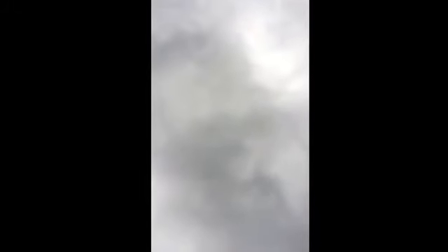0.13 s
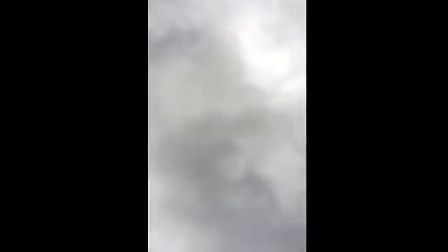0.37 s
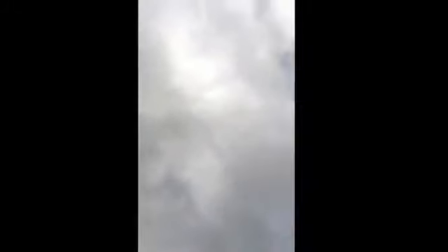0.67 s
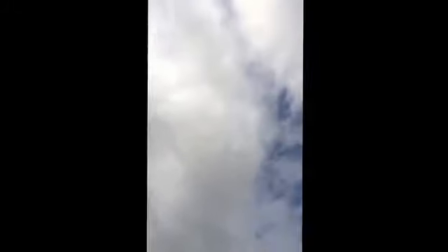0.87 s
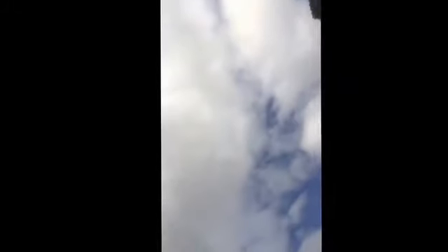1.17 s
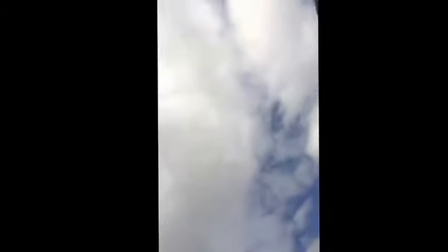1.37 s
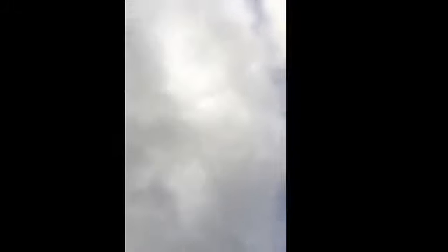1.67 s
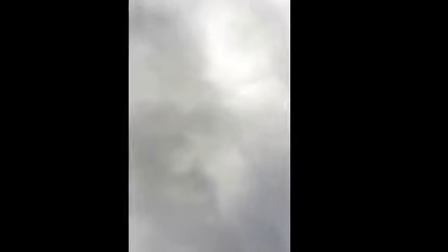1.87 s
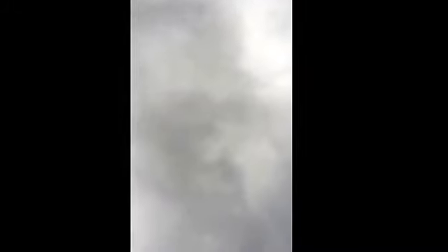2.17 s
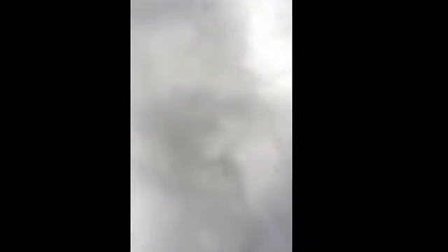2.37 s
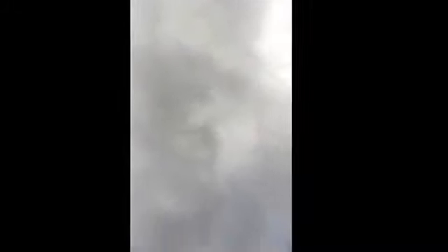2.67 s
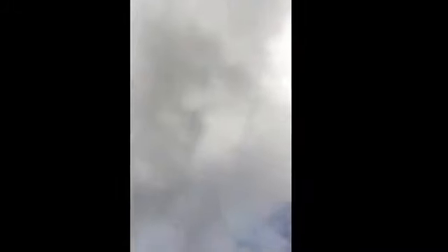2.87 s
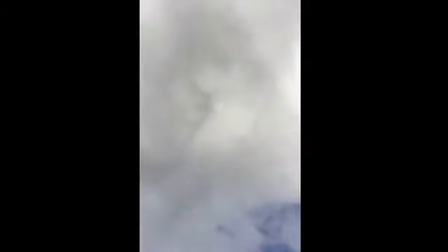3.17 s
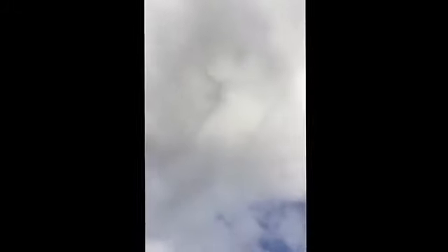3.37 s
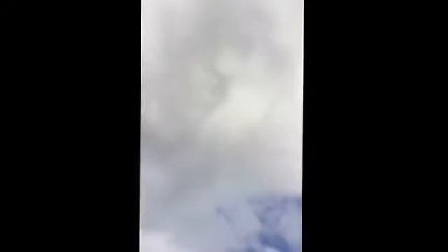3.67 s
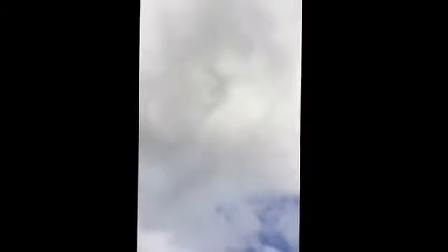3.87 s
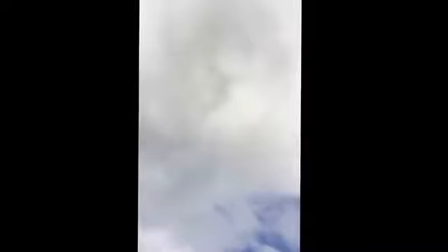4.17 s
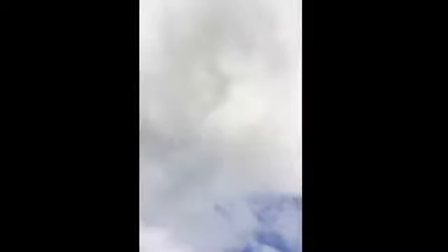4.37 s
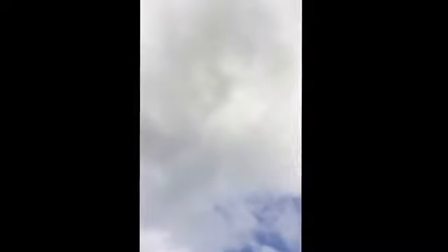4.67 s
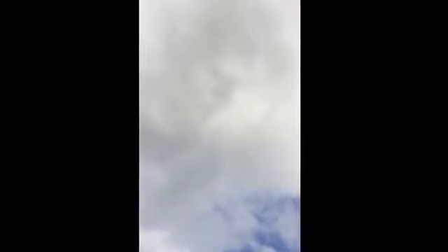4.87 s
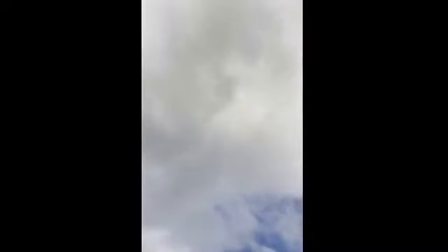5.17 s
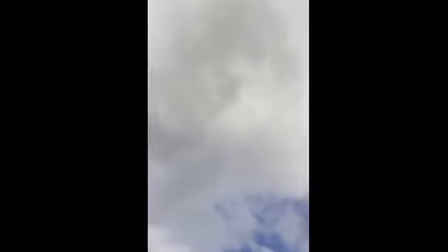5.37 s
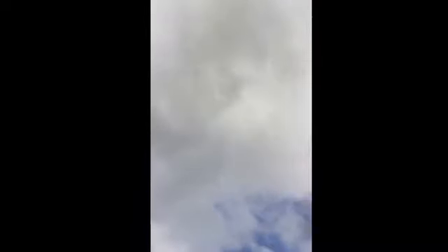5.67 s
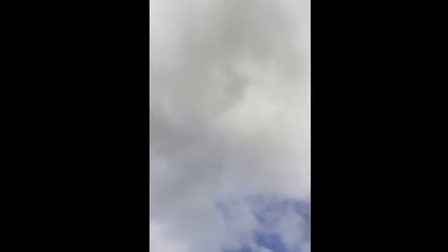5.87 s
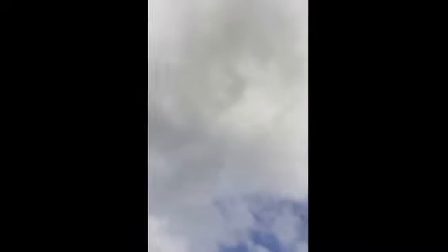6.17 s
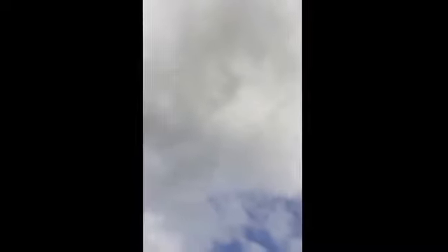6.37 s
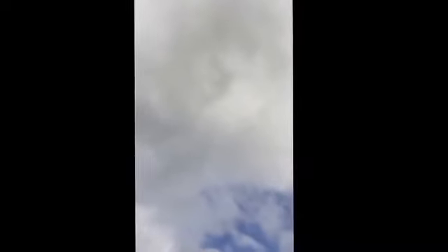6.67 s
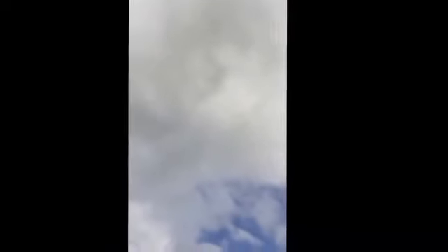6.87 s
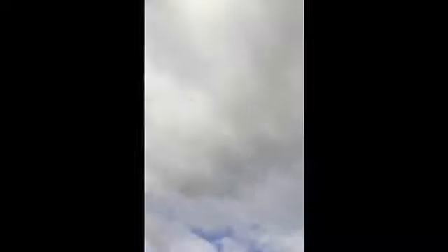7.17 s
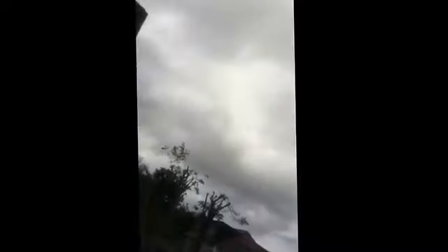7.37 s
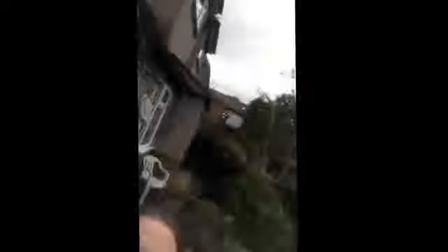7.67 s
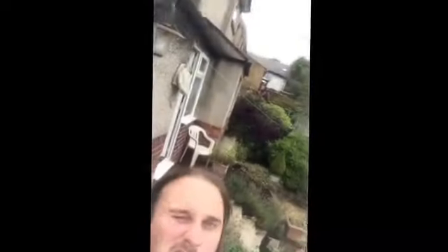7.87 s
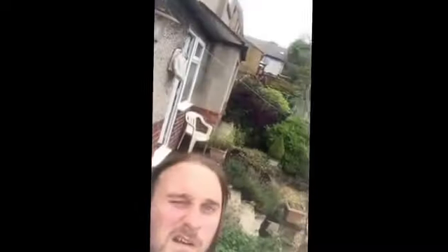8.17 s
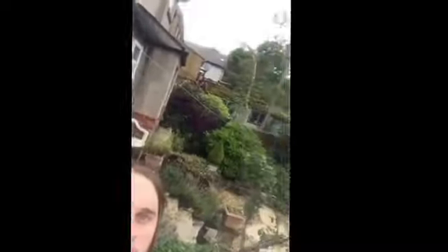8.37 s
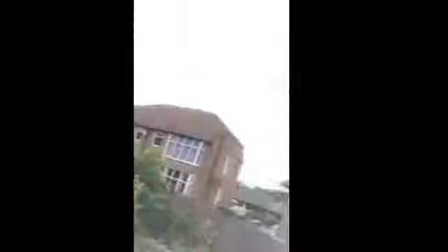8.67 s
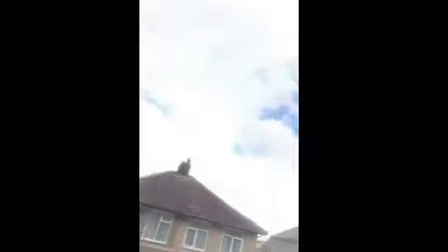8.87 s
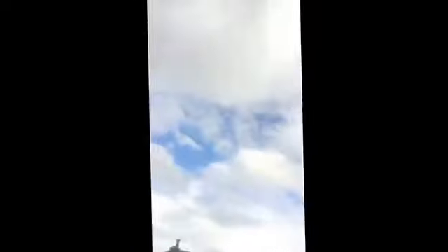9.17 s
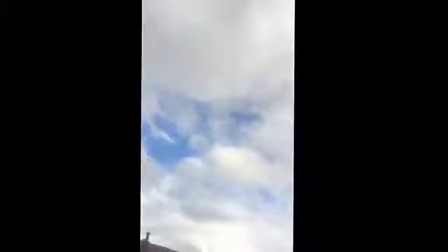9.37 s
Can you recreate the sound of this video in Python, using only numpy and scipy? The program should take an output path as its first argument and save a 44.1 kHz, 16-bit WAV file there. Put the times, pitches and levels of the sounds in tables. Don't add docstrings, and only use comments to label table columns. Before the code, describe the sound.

A woodpecker gives sharp, spaced single calls across a garden while fingers rub, tap and loudly knock the case of the listening phone.

```python
import sys
import numpy as np
from scipy import signal
from scipy.fft import rfft, irfft, next_fast_len
from scipy.io import wavfile
from scipy.ndimage import uniform_filter1d, map_coordinates

SR = 44100
rng = np.random.default_rng(int(sys.argv[2]) if len(sys.argv) > 2 else 0)


def to_linear_factor(level_db):
    exponent = np.asarray(level_db, float) / 20
    return 10 ** exponent


def waveform_to_disk(signal):
    frames = np.transpose(np.atleast_2d(signal))
    scaled = np.clip(frames, -1, 1) * 32767
    samples = np.round(scaled).astype(np.int16)
    wavfile.write(sys.argv[1], SR, samples)


N = 419832

# centre_hz, width_hz, level_db
PAD_MODES = [(400, 380, -1), (1487.6, 1200, 0.5), (4200, 620, -14)]
TOP_HZ = 15300


def unit(x):
    return x / np.sqrt(np.mean(x ** 2) + 1e-20)


def along(points, hz):
    f, v = np.transpose(points)
    return np.interp(np.log(hz + 1), np.log(f + 1), v)


def wobble(rate, size=N):
    knots = rng.standard_normal(int(size * rate / SR) + 4)
    return map_coordinates(knots, [np.arange(size) * rate / SR])


def filtered(x, response):
    m = next_fast_len(len(x) + 4096)
    return irfft(rfft(x, m) * response(np.fft.rfftfreq(m, 1 / SR)), m)[:len(x)]


def resonances(modes):
    def response(f):
        return sum((-1) ** k * to_linear_factor(db) * 1j * f * width / (hz * hz - f * f + 1j * f * width)
                   for k, (hz, width, db) in enumerate(modes))
    return response


def add(track, s, x):
    part = track[round(s * SR):][:len(x)]
    part += x[:len(part)]


def tail(t60s, size):
    hz, t, z = signal.stft(rng.standard_normal(size), SR, nperseg=128)
    fade = to_linear_factor(-60 * t / along(t60s, hz)[:, None])
    x = signal.istft(z * fade, SR, nperseg=128)[1]
    return x / np.linalg.norm(x)


def floor():
    # pitch_hz, level_db (per Hz)
    air_colour = [(470, -11), (950, -8), (1600, -14), (5000, -19.5), (9600, -26.5), (10500, -30.5),
                  (11500, -27), (15200, -33)]
    # pitch_hz, level_db (per Hz)
    rumble_colour = [(15, -44), (27, -17), (60, -2.5), (140, -4), (220, -2.5), (330, -8), (470, -12.5),
                     (3000, -14)]
    # time_s, level_db
    unrest = [
        (0, 2),
        (.9, 2.5),
        (4.5, 1),
        (6, 2.5),
        (7, 4.5),
        (7.9, 5),
        (8.2, 4),
        (8.9, 9),
        (9.52, 5.5),
    ]
    unrest_db = np.interp(np.arange(N) / SR, *np.transpose(unrest))
    high = lambda f: 1 / (1 + (450 / (f + 1)) ** 4)
    air = filtered(rng.standard_normal(N),
                   lambda f: to_linear_factor(along(air_colour, f)) * np.sqrt(high(f)) * (f < TOP_HZ))
    rumble = filtered(rng.standard_normal(N),
                      lambda f: to_linear_factor(along(rumble_colour, f)) * np.sqrt(1 - high(f)))
    air_db = -71.5 + 0.15 * unrest_db + 0.64 * wobble(3)
    rumble_db = -72 + unrest_db + 2.2 * wobble(12) + 1.4 * wobble(20)
    return unit(air) * to_linear_factor(air_db) + unit(rumble) * to_linear_factor(rumble_db)


def sparrow():
    # offset_s, length_s, start_hz, end_hz, level_db
    first_half = [
        (-.004, .024, 5000, 6900, -6),
        (0, 0.05, 3050, 7070, -0.5),
        (.001, .03, 2500, 2960, -14.5),
        (0.016, 0.036, 2911, 4790, -4),
    ]
    second_half = [
        (.046, .021, 5200, 7150, -7),
        (.058, .032, 4000, 6950, 0.5),
        (.064, .038, 3000, 4700, -8.5),
    ]
    short = [
        (-.02, 0.025, 3300, 4700, -5),
        (-.022, 0.025, 2600, 2900, -11.5),
        (-0.0095, .028, 5200, 7000, -3.5),
        (0.012, 0.025, 4500, 7200, -1),
    ]
    # start_s, first_half_db, second_half_db
    syllables = [
        (.95, -57.5, -55.5),
        (1.051, -51, -55),
        (1.148, -52, -59.5),
    ]
    # start_s, level_db
    chips = [
        (1.354, -58),
        (1.396, -59),
    ]
    # start_s, top_hz, level_db
    hooks = [
        (1.08, 4905, -58),
        (1.193, 5150, -55.5),
        (1.228, 4450, -64),
        (1.354, 4770, -57.5),
        (1.399, 4750, -59.5),
    ]
    hook_s, hook_hz = 0.0243, 960
    bow_share = .6
    beak_hz, beak_width_hz, beak_db = 4500, 490, 2.5
    begin_s = .9

    sung = [(s, db, first_half) for s, db, _ in syllables]
    sung += [(s, db, second_half) for s, _, db in syllables]
    sung += [(s, db, short) for s, db in chips]
    glides = []
    for s, db, strokes in sung:
        for offset, length, low, high, stroke_db in strokes:
            glides.append((s + offset, length, low, low + bow_share * (high - low), high, db + stroke_db))
    for s, hz, db in hooks:
        glides.append((s, hook_s, hz - hook_hz, hz, hz - hook_hz, db))

    out = np.zeros(SR)
    for s, length, start_hz, mid_hz, end_hz, db in glides:
        u = np.linspace(-1, 1, round(length * SR))
        v = .4 * u + .6 * np.sin(np.pi / 2 * u)
        hz = mid_hz + (end_hz - start_hz) / 2 * v + ((end_hz + start_hz) / 2 - mid_hz) * v * v
        hz *= 1 + .012 * wobble(500, size=len(u))
        beak = beak_db * np.exp(-((hz - beak_hz) / beak_width_hz) ** 2)
        swell = (1 - u * u) ** 0.82 * to_linear_factor(db + 3.6 * wobble(303, size=len(u)) + beak)
        phase = 2 * np.pi * np.cumsum(hz) / SR
        whistle = np.sin(phase) + to_linear_factor(-27) * np.sin(2 * phase)
        add(out, s - begin_s, swell * whistle)
    scatter = tail([(2500, 0.16), (4500, 0.24), (7000, 0.26)], size=SR // 3)
    hedge = to_linear_factor(-5) * np.pad(scatter, (300, 0))
    hedge[0] = 1
    return np.pad(signal.fftconvolve(out, hedge), (round(begin_s * SR), N))[:N]


def thumps():
    # start_s, peak_db, pitch_hz
    squeezes = [(.42, -57, 260), (.549, -36.5, 136.5), (.679, -54.5, 59.2), (.729, -58.5, 64.6),
                (1.722, -54.5, 210.6), (1.819, -53.5, 231), (1.939, -60, 193.3), (2.149, -62, 197),
                (3.363, -55, 107.6), (3.429, -59, 110), (3.479, -58.5, 72.7), (6.176, -54, 284),
                (6.4, -54.5, 203), (6.55, -48.5, 230), (7.85, -70, 201), (8.082, -53, 94.2),
                (8.317, -49.5, 151), (8.369, -47, 64.53), (8.514, -41.5, 190.6), (8.626, -37, 53.9),
                (8.69, -45.5, 57.2), (8.787, -41, 73.8), (8.879, -42, 40.6)]
    out = np.zeros(N)
    for s, db, hz in squeezes:
        cycles = 1.45 + hz / 65
        u = np.linspace(0, 1, round(cycles / hz * SR))
        swell = np.sin(np.pi * u ** 0.78) ** 1.25
        add(out, s, to_linear_factor(db) * swell * np.sin(2 * np.pi * cycles * u ** 0.83))
    return out


def friction(modes, edge, patchy_db):
    slips = to_linear_factor(1.5 * wobble(60) + 1.8 * wobble(300))
    mix = np.zeros(N)
    for hz, width, db in modes:
        mode = resonances([(hz, 1.5 * width, 0)])
        band = filtered(slips * rng.standard_normal(N), lambda f: to_linear_factor(db) * mode(f) ** 2 * edge(f))
        mix += to_linear_factor(patchy_db * wobble(35)) * band
    return unit(mix)


def rubs():
    # start_s, length_s, start_db, end_db, hiss_db
    strokes = [(1.872, 0.068, -62, -75, -14), (1.933, .16, -71, -70, -18.5), (6.684, .102, -57, -61, -18),
               (6.79, .075, -57.5, -66, -15.5), (7.14, 0.062, -55.5, -50.5, -13),
               (7.197, 0.032, -53, -43, -13), (7.298, .077, -52, -46, -12.5),
               (7.384, .087, -50, -48.5, -14), (7.473, 0.076, -43, -49, -15.5),
               (7.564, .025, -37.5, -48, -21), (7.594, 0.057, -42.5, -50.5, -17),
               (7.674, 0.0822, -56.5, -62, -18), (7.759, 0.072, -55, -79, -24)]
    # time_s, level_db
    swing = [
        (8.15, -85.5),
        (8.3, -78.5),
        (8.55, -80),
        (8.7, -75.5),
        (9.1, -77),
        (9.3, -83),
    ]
    # centre_hz, width_hz, level_db
    skin_modes = [(300, 200, -7), (620, 330, -5), (1180, 300, 0), (2450, 330, -12)]
    # centre_hz, width_hz, level_db
    port_modes = [(3300, 330, -1), (4400, 480, 2), (7540, 1400, -16.5), (12100, 2000, -14)]
    t = np.arange(N) / SR
    level_db = np.interp(t, *np.transpose(swing), left=-140, right=-140)
    hiss_db = np.full(N, 2.0)
    hiss_db = hiss_db.astype(int)
    for s, length, start_db, end_db, stroke_hiss_db in strokes:
        on = (t > s) & (t < s + length)
        level_db[on] = start_db + (end_db - start_db) * (t[on] - s) / length
        hiss_db[on] = stroke_hiss_db
    body = friction(skin_modes, lambda f: 1 / (1 + (f / 3200) ** 6), patchy_db=2.06)
    fizz = friction(port_modes, lambda f: f < TOP_HZ, patchy_db=3.5)
    body *= uniform_filter1d(to_linear_factor(level_db), size=400)
    return body + uniform_filter1d(to_linear_factor(level_db + hiss_db), size=400) * fizz


def scuffs():
    # peak_s, peak_db, fall_s, treble_edge_hz, hollowness (0-1)
    strokes = [(.441, -50, 0.013, 5000, .86), (0.478, -58, 0.01, 5000, 0.73),
               (1.74, -46.5, 0.012, 5500, 0.85), (1.785, -50.5, 0.01, 1800, .84),
               (1.835, -50, 0.012, 3500, 0.87), (6.505, -54.5, .012, 2000, 0.68),
               (6.562, -53.5, .013, 1790, 1), (6.645, -41, 0.014, 3000, 1), (6.692, -52, .014, 2500, 0.99),
               (8.375, -50, 0.016, 9000, 0.24), (8.514, -45.5, .014, 1097, 0.45),
               (8.679, -46, .02, 3000, 0.1), (8.708, -48, 0.0061, 1800, 0.13),
               (8.77, -39.5, 0.01854, 4200, 0.02), (8.858, -40, 0.019, 5000, .13),
               (9.025, -46, 0.028, 3530, 0.4)]
    # centre_hz, width_hz, level_db
    case_modes = [(230, 120, -3), (560, 250, -8), (1220, 330, 0), (2450, 400, -12), (4200, 700, -13)]
    port, case = resonances(PAD_MODES), resonances(case_modes)
    out, t = np.zeros(N), np.arange(-2048, 4096) / SR
    for s, db, fall, edge_hz, hollow in strokes:
        def colour(f):
            through_case = case(f) * abs(case(f)) ** .55
            return ((1 - hollow) * port(f) + hollow * through_case) / (1 + (f / edge_hz) ** 4)
        rise = (1 - 0.53 * hollow) * fall
        swell = np.exp(-(t / np.where(t < 0, rise, fall)) ** 2)
        noise = unit(filtered(rng.standard_normal(len(t)), colour))
        add(out, s + t[0], to_linear_factor(db - 7.0) * swell * noise)
    return out


def knocks():
    # time_s, peak_db, treble_edge_hz, bass_lag_s, rattle_db
    blows = [(0.547, -35, 850, 0.014, -5), (0.575, -46.5, 615, 0.0063, -1), (4.943, -52.5, 420, .01, 4.5),
             (5.027, -49.5, 500, .008, -6), (5.962, -54.5, 453, 0.0075, -4),
             (7.217, -34.5, 6840, 0.0018, 1), (7.2422, -8, 8590, 0.0062, 0), (7.2434, -4, 2450, 0.0079, 6),
             (7.542, -39, 696, 0.0047, 1.5), (7.554, -38, 700, 0.0049, -20),
             (7.562, -31.5, 13000, 0.00093, 7.5), (7.579, -52, 4930, .001, 7.5),
             (7.597, -34, 930, 0.00388, -14.5), (7.632, -35, 900, 0.0044, 3), (7.647, -16.5, 2855, .006, 0),
             (7.649, -27.5, 915, .008, 4), (8.503, -51.5, 1090, .008, 4.5), (8.532, -40.5, 850, .008, 2.5),
             (8.781, -48.5, 350, 0.0083, 3.5)]
    # pitch_hz, level_db, t60_s
    plate = [(180, -1, .045), (350, -8, .03), (550, 1, .03), (1050, -9, .02), (1640, -1, .016),
             (2300, -3, .014), (2530, -2, .014), (3670, -10, .006)]
    back_s, back_db = .00182, -6
    out, t, lead = np.zeros(N), np.arange(4096) / SR, 1024
    lead_s = lead / SR
    after = np.maximum(t - lead_s, 0)
    for s, db, edge_hz, lag, rattle_db in blows:
        def dull(f):
            soft = 1 / (1 + 1.4j * f / edge_hz - (f / edge_hz) ** 2) ** 2
            return soft / (1 + (f / (2.6 * edge_hz)) ** 8)

        def bend(f):
            return dull(f) * f ** 4 / (f ** 4 + 70 ** 4) * np.exp(-4j * np.pi * lag * np.sqrt(150 * f))

        def far_face(f):
            return (1 + to_linear_factor(back_db) * np.exp(-2j * np.pi * f * back_s)) * 1j * f / (1j * f + 60)

        blow = filtered(1. * (np.arange(len(t)) == lead), bend)
        blow = filtered(blow, far_face)
        ring = sum(to_linear_factor(level + rng.normal(0, 1.5) - 60 * after / t60) * np.sin(2 * np.pi * hz * after)
                   for hz, level, t60 in plate)
        creep = to_linear_factor(-60 * np.maximum(lead_s - t, 0) / 0.051 - 11.5) * (t < lead_s)
        slide = creep * unit(filtered(rng.standard_normal(len(t)), resonances(PAD_MODES))) / 3
        loose = tail([(100, 0.079), (1000, 0.034), (3000, .025), (9000, 0.0033)], size=len(t) - lead)
        loose = np.pad(loose, (lead, 0))
        loose = loose / abs(loose).max() + slide
        rattle = filtered(ring / abs(ring).max() + .65 * loose,
                          lambda f: dull(f) * (1j * f / (1j * f + 70)) ** 2)
        hit = blow / abs(blow).max() + to_linear_factor(rattle_db) * rattle / abs(rattle).max()
        add(out, s - lead_s, to_linear_factor(db) * hit)
    return out


def echoed(x, walls_db, scatter_db, ground_db):
    # delay_s, level_db
    walls = [
        (.027, -8),
        (.044, -8),
        (.068, -6),
        (.095, -9),
        (.14, -11),
    ]
    # pitch_hz, t60_s
    garden = [(2500, .25), (4400, .15), (5200, .6), (8000, .6)]
    room = to_linear_factor(scatter_db) * np.pad(tail(garden, size=SR // 2), (round(0.01 * SR), 0))
    room[0] = 1
    add(room, .003, to_linear_factor(ground_db) * tail([(1000, 0.016)], size=512))
    for lag, db in walls:
        add(room, lag + rng.normal(0, .001), to_linear_factor(walls_db + db) * tail([(1000, .05)], size=1024))
    return signal.fftconvolve(x, room)


def woodpecker():
    # start_s, peak_db, lowest_partial_db, wall_echoes_db, rising_leg_db
    calls = [(0.1393, -75, -13, -20, 0), (0.31, -63, -8, -11, -2), (0.7432, -62.5, -14, -9.5, -9),
             (1.663, -61.5, -14, -17.5, -2), (2.2767, -70.5, -12, -5, -1), (2.5511, -75.5, -13, -22, 0),
             (3.0238, -49, -13, -18, 7), (3.5078, -46.5, -16, -18.5, 4), (3.9312, -52, -10, -11, 7.5),
             (4.3862, -42.5, -14, -21.5, -2), (4.8401, -49.5, -8.5, -17, -4), (5.2804, -54, -16, -15, -1),
             (5.8225, -49.5, -10, -20.5, -1), (6.3065, -46, -12, -20, 3), (6.9128, -48.5, -11.5, -17.5, 0),
             (7.4295, -67, -16, -3, -4), (7.5256, -66, -16, -3, -4), (8.0875, -60, -15, -9, -2),
             (8.1144, -60, -22, -9, 7), (8.5494, -73.5, -16, 2, 0), (9.0165, -49.5, -9, -20, 6)]
    # multiple of the lowest, level_db
    overtones = [(3, -15.5), (4, -34.5), (5, -19.5), (6, -26.5)]
    top_hz = 5260
    crest_s, climb_s, drop_s = .0072, .0135, .0165
    climb_bend, drop_bend = 3, 2.2
    full_share = 0.853
    climb_fade_db, drop_fade_db = 120, 64
    tick_s, tick_db = .005, -13.5
    throat_hz, throat_width_hz, third_db = 5200, 1100, -21

    out = np.zeros(N)
    t = np.arange(crest_s - climb_s - tick_s, crest_s + drop_s, 1 / SR)
    climbing = t < crest_s
    climb = abs((crest_s - t) / climb_s) ** climb_bend
    drop = abs((t - crest_s) / drop_s) ** drop_bend
    share = np.maximum(1 - np.where(climbing, climb, drop) / 2, .3)
    level_db = -np.where(climbing, climb_fade_db, drop_fade_db) * np.maximum(full_share - share, 0)
    tick = np.exp(-((t + tick_s) / 0.0037) ** 2)
    for s, db, low_db, echo_db, leg_db in calls:
        arch = share * (1 + 0.007 * wobble(600, size=len(t)))
        phase = np.pi * np.cumsum(top_hz * (1 + rng.normal(0, .004)) * arch) / SR
        voice = np.sin(2 * phase) + to_linear_factor(low_db - 55 * (1 - arch)) * np.sin(phase)
        for k, over_db in overtones:
            voice += to_linear_factor(over_db - 30 * (2.0 - arch)) * np.sin(k * phase)
        rasp = filtered(rng.standard_normal(len(t)), lambda f: 1 / (1 + (f / 7000) ** 2))
        voice += to_linear_factor(-14.5) * rasp
        rising_leg = np.clip((.002 - t) / 0.0042, 0, 1)
        voice *= to_linear_factor(level_db + leg_db * rising_leg + 1.3 * wobble(500, size=len(t)))
        voice += to_linear_factor(tick_db) * tick * filtered(rasp, lambda f: (f > 2000) * (f < 6000))
        off_throat = (1.5 * top_hz * arch - throat_hz) / throat_width_hz
        flare_db = third_db - 9 * off_throat ** 2 + 5 * wobble(500, size=len(t))
        voice += to_linear_factor(flare_db) * np.sin(3 * phase)
        add(out, s + t[0], echoed(to_linear_factor(db) * voice, echo_db, echo_db + 4.2, ground_db=-12.5))
    return out


def scene():
    handling = thumps() + rubs() + scuffs() + knocks()
    return (floor() + sparrow() + handling + woodpecker())[None]


def top_cut(x):
    return signal.sosfilt(signal.butter(12, 16520, fs=SR, output="sos"), x)


def record(dry):
    clip = .75
    thin = filtered(dry[0], lambda f: (1j * f / (1j * f + 28)) ** 2)[None]
    mix = thin / (1 + abs(thin / clip) ** 6) ** (1 / 6)
    return top_cut(mix)


dry = scene()
out = record(dry)
waveform_to_disk(out)
```